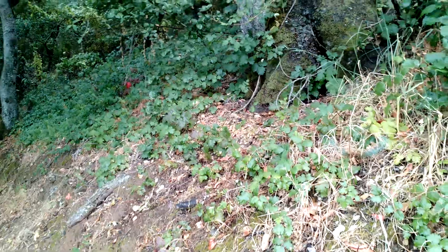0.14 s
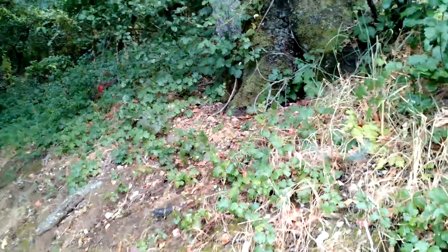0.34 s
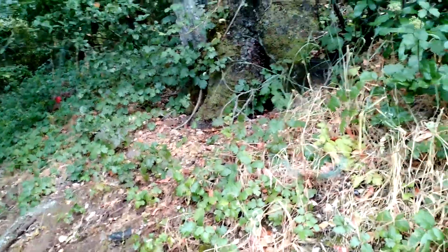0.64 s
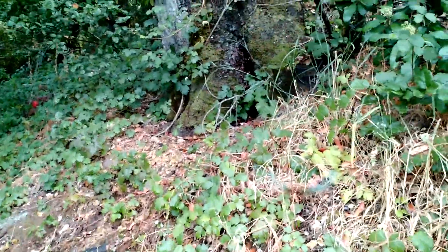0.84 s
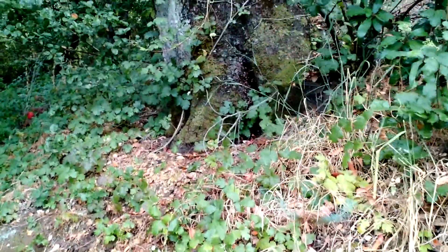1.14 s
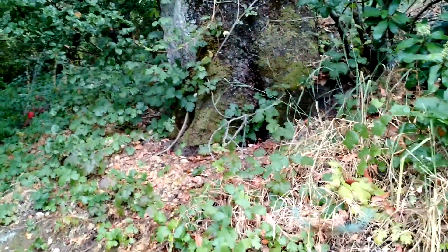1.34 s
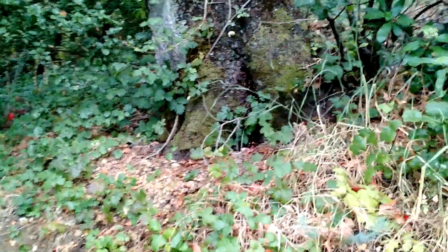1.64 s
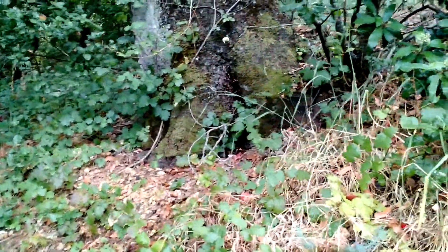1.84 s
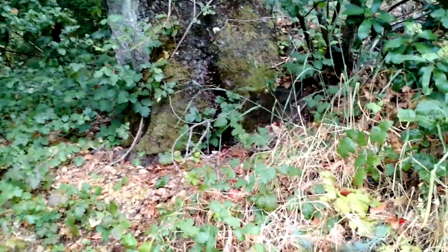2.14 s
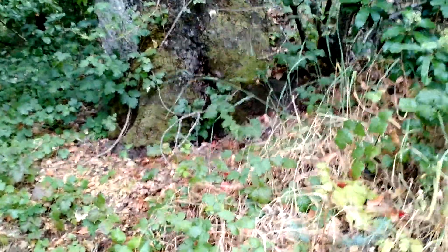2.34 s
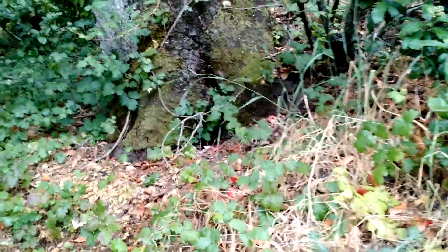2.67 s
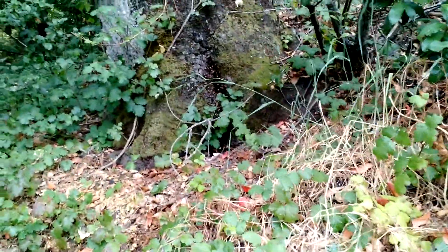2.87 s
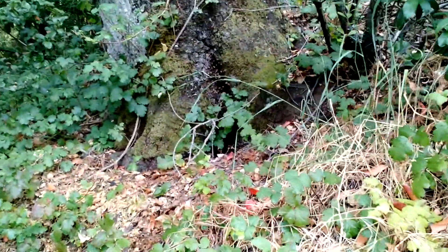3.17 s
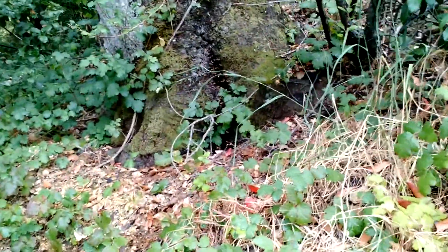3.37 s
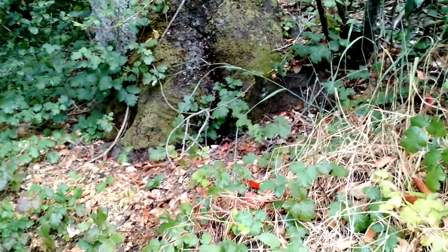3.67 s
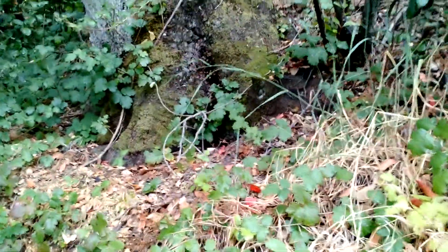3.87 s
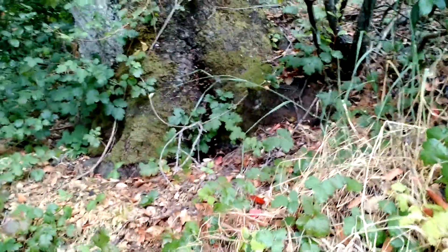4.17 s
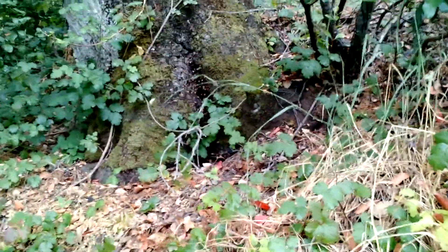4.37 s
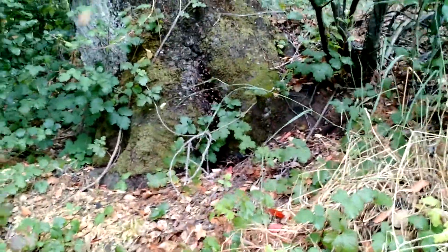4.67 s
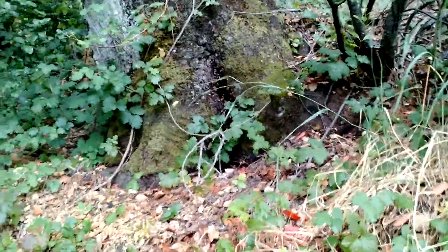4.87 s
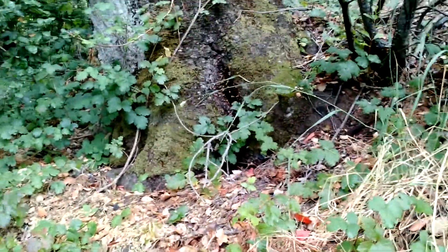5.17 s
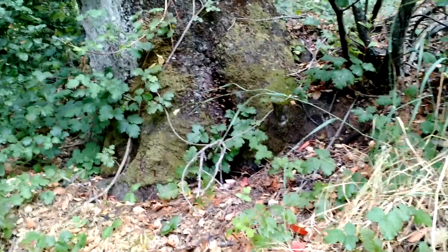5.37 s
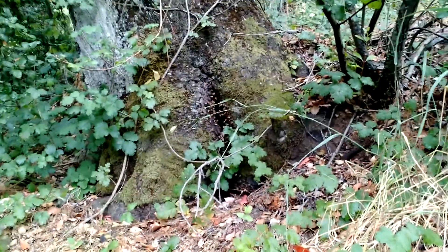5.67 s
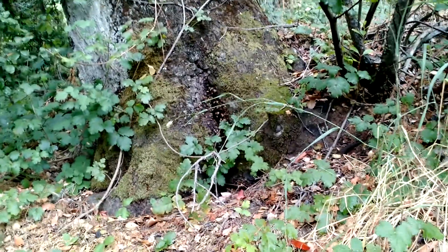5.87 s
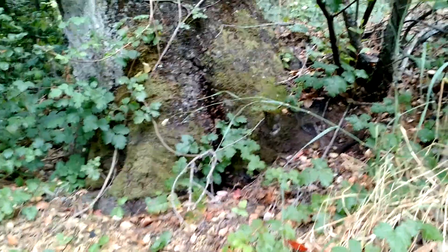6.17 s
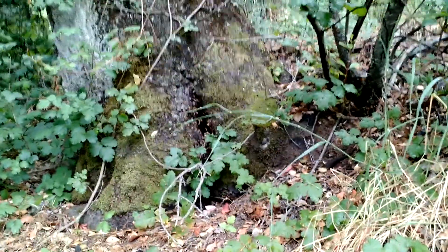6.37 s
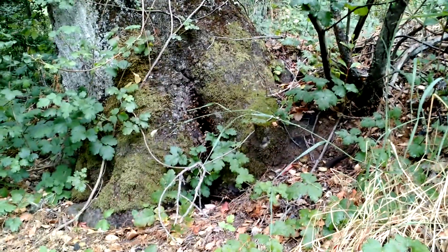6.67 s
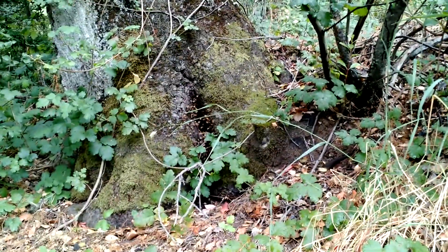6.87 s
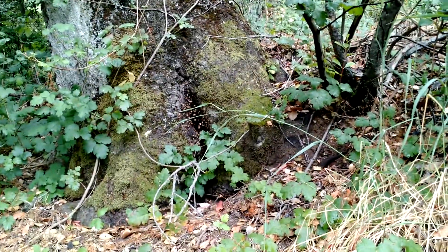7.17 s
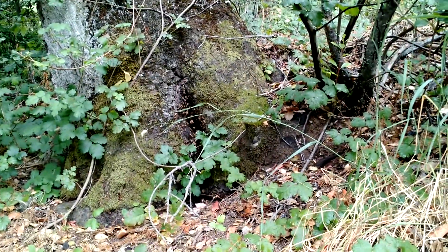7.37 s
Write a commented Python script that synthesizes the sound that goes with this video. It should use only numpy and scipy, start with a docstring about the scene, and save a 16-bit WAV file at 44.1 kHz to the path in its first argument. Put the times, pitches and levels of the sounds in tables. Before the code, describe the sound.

From 0 s a bee swarm buzzes continuously, many wing beats around 165-280 Hz blending into a thick, wavering drone, a little stronger at the start, dipping around 1 s. Under it are low rumble and unsteady hand shake, with soft air hiss brighter on the right; a very deep hum stops at about 1.4 s. A faint dry twig tick comes at 1.9 s, a sharper one at 3.8 s, then two small ones by 4.1 s, with a soft sleeve brush at 3.9 s. From about 5.3 s the swarm swells slightly, a tick and short cloth scuffs come close on the left, growing into a longer rub from 5.7 to 6.1 s. Across it, from 5.6 to 6.7 s, a bird gives a hoarse, high rasp on the right, climbing quickly, then throbbing about sixteen times a second and fading. Another tick falls near 5.85 s. The buzz alone continues to 7.5 s, the shaking calmer.

```python
"""Bees swarm at a tree trunk in a wood, a few steps from a hand-held camera with two microphones.
From the start: summed wing strokes, noise for low rumble, air hiss and hand shake, a sine hum to 1.4 s.
From 1.9 s twigs tick (decaying ring and crack); from 3.9 s a sleeve brushes at the left (gated noise).
From 5.6 s a bird rasps (noise on a climbing carrier) and rattles (rising chirps), its rasp on the right.
The camera widens its stereo by taking a late copy of each microphone out of the other side."""
import sys
import numpy as np
from scipy import signal
from scipy.fft import rfft, irfft, next_fast_len
from scipy.io import wavfile
from scipy.ndimage import map_coordinates

SR = 44100
rng = np.random.default_rng(int(sys.argv[2]) if len(sys.argv) > 2 else 0)


def file_out(sig):
    """Save sig as 16-bit WAV at sys.argv[1]."""
    # one column per channel
    cols = np.atleast_2d(sig).T
    # limit, then scale
    lim = np.clip(cols, -1, 1)
    pcm = np.round(lim * 32767).astype(np.int16)
    wavfile.write(sys.argv[1], SR, pcm)


N = 331191
T = np.arange(N) / SR  # s

# Levels hold at the microphones, before side gains and widening. Spectra are relative, per Hz.
# Air hiss spectrum: f/Hz, density/dB
AIR_SPECTRUM = [(60, -120), (110, -8), (140, 13), (175, 12), (310, 9.5), (600, -2), (1200, 4), (2000, -4),
                (2350, -2.5), (2650, -20.5), (2900, 2.5), (3300, -2.5), (4500, -2), (6300, -1.5),
                (9000, -3.5), (10500, -4.5), (16000, -9.5)]
# Air hiss balance: f/Hz, left-right/dB
AIR_BALANCE = [(60, 2), (200, 6.5), (600, 6), (2500, -5), (5000, -6.5), (10000, -4), (15000, -4)]
# Low rumble spectrum at first: f/Hz, density/dB
LOW_FIRST = [(12, -120), (20, -10), (45, -2.5), (75, -3.5), (100, -16.5), (130, -22.5), (180, -17),
             (215, -16), (300, -120)]
# Low rumble spectrum once risen: f/Hz, density/dB
LOW_RISEN = [(12, -120), (20, -12), (45, -5.5), (85, -7), (112, -7), (140, -26.5), (250, -120)]
# Hand shake spectrum: f/Hz, density/dB
SHAKE_SPECTRUM = [(1, 0), (11, -1), (16, -5), (26, -10), (40, -16), (80, -24), (134, -32), (300, -44),
                  (600, -120)]
# Twig ticks: t/s, ring level/dB, ring f/Hz, left-right/dB
TWIG_TICKS = [(1.945, -50, 4340, -18), (3.7986, -35.5, 6420, -9), (3.904, -47, 6170, -19),
              (4.066, -43, 3200, -3), (5.318, -39, 4640, -18), (5.848, -37, 3700, 2)]
# Long sleeve stroke: t/s, dull rub/dB, bright rub/dB, broad hiss/dB
LONG_STROKE = [(5.66, -64, -60, -59), (5.734, -49, -50, -46), (5.768, -54, -50, -52), (5.79, -44, -44, -46),
               (5.846, -41, -40.5, -46), (5.89, -43, -42.5, -50), (5.95, -46, -46.5, -57),
               (5.99, -46, -43.5, -59), (6.04, -56, -51.5, -60), (6.065, -45, -43, -65),
               (6.098, -44.5, -42.5, -59), (6.12, -71, -59, -58), (6.22, -73, -61, -64),
               (6.36, -80, -72, -69)]
# Short sleeve brushes: t/s, Gaussian 1/e half-width/s, dull rub/dB, bright rub/dB
SHORT_BRUSHES = [(3.91, 0.072, -57.5, -61), (5.284, 0.023, -46, -54), (5.297, 0.0095, -48.5, -53),
                 (5.313, 0.0074, -54, -48), (5.374, 0.004, -49, -59), (5.39, 0.0086, -54, -42),
                 (5.403, 0.0099, -49, -44.5), (5.416, 0.0065, -58, -51), (5.489, 0.034, -56, -50.5),
                 (5.6, 0.0097, -54.5, -50)]
# Dull rub of the long stroke: f/Hz, density/dB
STROKE_DULL = [(150, -120), (300, 1.5), (600, 4), (1200, 5.5), (1600, 3.5), (2000, -9), (2350, -13),
               (2550, -32), (4000, -120)]
# Dull rub of the short brushes: f/Hz, density/dB
BRUSH_DULL = [(200, -120), (400, 8), (800, -2.5), (1500, 1), (2100, -4), (2400, -4), (2700, -30),
              (4000, -120)]
# Bright rub of both: f/Hz, density/dB
RUB_BRIGHT = [(1800, -120), (2100, -22), (2530, -18), (2720, -2.5), (3200, -4), (3900, -15), (5000, -15),
              (7000, -13.5), (10000, -19), (16000, -41)]
# Hoarse noise in the call: f/Hz, density/dB
HOARSE_SPECTRUM = [(2450, -120), (2600, -17), (2800, 5), (3300, 5), (4500, 9), (6500, 0), (8000, -120)]
# Swell of each successive throb once the band is open: swell/dB
THROB_SWELLS = [3, 3, 6, 6, 1, 2, 3, 4, 5.5, 4.5, 3.5, 5, 6, 7, 6, 1]
# Swarm course: t/s, bees level/dB, low rumble level/dB (far drone, plus handling from 5.3 s)
SWARM_LEVELS = [(0, -50.5, -43), (.3, -52, -45.5), (.8, -54.5, -49.5), (1.4, -54.5, -50.5), (2, -53.5, -54),
                (2.7, -53.5, -53), (3.6, -52, -53), (4.2, -52, -52.5), (5.1, -52, -54), (5.35, -50, -48),
                (5.9, -49, -50), (6.25, -50, -48.5), (6.6, -51.5, -50), (7, -51.5, -51),
                (7.51, -51.5, -53.5)]
# Wing stroke harmonics: multiple of the wing rate/1, level/dB (relative)
WING_HARMONICS = [(1, 2), (2, 2.5), (3, -8), (4, -10), (5, -9.5), (6, -52), (7, -20.5), (8, -14)]
# Spread of mean wing rates: share of bees below/1, f/Hz
WING_RATES = [(0, 165), (.1, 192), (.28, 222), (.6, 243), (.9, 260), (1, 282)]
# Stereo widening: f/Hz, share of the other side taken out/1
CROSS_SHARE = [(20, .4), (150, .5), (500, .75), (1300, .95), (2650, 1), (4000, .76), (5500, .42),
               (9000, .3), (15000, .17)]

HISS_DB, HISS_FOLLOWS = -53.5, 0.91  # mean level; share of the swarm's dB swings followed
LOW_RISES_S = 5.9
SHAKE_DB, SHAKE_SWAY_DB, STEADY_FROM_S, CALM_DB_PER_S = -44.5, 1.5, 5.5, 7
HUM_HZ, HUM_AMPLITUDE_DB, HUM_ENDS_S, HUM_RELEASE_S = 46.8, -41, 1.39, .03
RING_T60_S, CRACK_T60_S, TICK_RISE_S, CRACK_OVER_RING_DB = .016, .016, .0003, 4
CALL_S, CALL_ENDS_S, CALL_ATTACK_S, CALL_RELEASE_S = 5.62, 6.7, 0.043, 0.16
CALL_DB, ACCENT_DB, ACCENT_S, SAG_DB_PER_S = -47, 6, 0.081, 8.5  # louder start, then fading effort
CENTRE_HZ, WIDTH_HZ, CLIMB_S = (4490, 5420), (650, 2100), 0.16  # band at start and once open
HOARSE_DB, HOARSE_EXTRA_DB = -6, 2.3  # re tonal rasp; extra before the band opens
RATTLE_S, THROB_SPACING_S = 5.633, .0637
THROB_PEAK_S, THROB_WIDTH_S = 0.016, 0.018  # from throb start
SLIP_DB, SLIP_PEAK_S, SLIP_WIDTH_S = -55.5, .013, 0.012
TOP_HZ = 15550


def amp(db):
    """dB to gain."""
    return 10 ** (np.asarray(db) / 20)


def unit(x):
    """Scale to rms 1."""
    return x / np.sqrt(np.mean(np.abs(x) ** 2) + 1e-20)


def along(points, hz):
    """Interpolate (Hz, value) points on a log frequency axis."""
    f, v = np.transpose(points)
    return np.interp(np.log(hz + 1), np.log(f + 1), v)


def curves(rows):
    """Interpolate each column over time; last comes a gate that is zero outside the rows' span."""
    s, *cols = np.transpose(rows)
    gate = np.clip(np.minimum(T - s[0], s[-1] - T) / 0.013, 0, 1)
    return [np.interp(T, s, c) for c in cols] + [gate]


def held(start_s, end_s, attack_s, release_s):
    """Linear attack, hold, linear release."""
    return np.clip(np.minimum((T - start_s) / attack_s, (end_s - T) / release_s), 0, 1)


def wobble(rate_hz, t=T, count=1):
    """Smooth random curves through rate_hz knots a second."""
    knots = rng.standard_normal((count, int(t[-1] * rate_hz) + 4))
    return np.array([map_coordinates(k, [t * rate_hz], order=2) for k in knots])


def filtered(x, response):
    """Apply a complex response of frequency."""
    m = next_fast_len(N + 8192)
    return irfft(rfft(x, m) * response(np.fft.rfftfreq(m, 1 / SR)), m)[..., :N]


def noise(spectrum, alike_hz):
    """Coloured noise, rms 1, alike at both microphones well below alike_hz, unrelated well above."""
    def shape(hz):
        turn = np.arccos(np.exp(-(hz / alike_hz) ** 2)) / 2
        return amp(along(spectrum, hz)) * [np.cos(turn), np.sin(turn)]

    both, apart = filtered(rng.standard_normal((2, N)), shape)
    return unit(np.array([both + apart, both - apart]))


def air_hiss():
    """Far leaves and microphone hiss: broadband noise, brighter on the right, following the swarm."""
    bees_db = curves(SWARM_LEVELS)[0]
    breeze_db = HISS_FOLLOWS * (bees_db - bees_db.mean()) + .5 * wobble(7.3)
    balance = lambda hz: amp(along(AIR_BALANCE, hz) * [[.5], [-.5]])
    hiss = filtered(noise(AIR_SPECTRUM, alike_hz=1110), balance)
    return amp(HISS_DB + breeze_db) * hiss


def low_rumble():
    """Far drone, plus handling from 5.3 s: low noise rising in pitch by an equal-power crossfade."""
    low_db = curves(SWARM_LEVELS)[1]
    risen = np.clip(T / LOW_RISES_S, 0, 1) * np.pi / 2
    first = np.cos(risen) * noise(LOW_FIRST, alike_hz=307)
    last = np.sin(risen) * noise(LOW_RISEN, alike_hz=315)
    return amp(low_db) * (first + last) * amp([[2], [-1]])


def hand_shake():
    """The body rocks in the hand: low noise, largely opposite at the microphones, calming at the end."""
    calm_db = CALM_DB_PER_S * np.maximum(T - STEADY_FROM_S, 0)
    shake_db = SHAKE_DB + SHAKE_SWAY_DB * wobble(1.5) - calm_db
    return amp(shake_db) * noise(SHAKE_SPECTRUM, alike_hz=2000) * [[.74], [-.68]]


def body_hum():
    """The body hums at first: a sine pushing the microphones opposite ways."""
    gate = held(0, HUM_ENDS_S, .06, HUM_RELEASE_S)
    hum = amp(HUM_AMPLITUDE_DB + .8 * wobble(4)[0]) * gate * np.sin(2 * np.pi * HUM_HZ * T)
    return hum * [[1.1], [-.9]]


def twigs():
    """Dry ticks: a decaying sine ring and noise crack; thin wood gives no bass and a dull top."""
    out = np.zeros((2, N + SR))
    t = np.arange(SR // 40) / SR
    for s, db, hz, pan_db in TWIG_TICKS:
        ring = np.sin(2 * np.pi * hz * t) * amp(-60 * t / RING_T60_S)
        crack = rng.standard_normal((2, len(t))) * amp(CRACK_OVER_RING_DB - 60 * t / CRACK_T60_S)
        gains = amp(db + np.array([[pan_db], [-pan_db]]) / 2)
        out[:, round(s * SR):][:, :len(t)] += gains * (ring + crack) * (1 - np.exp(-t / TICK_RISE_S))
    wood = lambda hz: 1 / (1 + 1j * hz / 12000) ** 2 / (1 - 1j * 2800 / (hz + 1)) ** 2
    return filtered(out[:, :N], wood)


def sleeve():
    """Cloth slides in many small slips, its rub much nearer the left microphone."""
    dull_db, bright_db, hiss_db, gate = curves(LONG_STROKE)
    dull, crease, bright = gate * amp(dull_db), 0, gate * amp(bright_db)
    for s, width_s, low_db, high_db in SHORT_BRUSHES:
        swell = np.exp(-((T - s) / width_s) ** 2)
        crease = crease + amp(low_db) * swell
        bright = bright + amp(high_db) * swell
    slips = unit(amp(1.7 * wobble(400) + .7 * wobble(40)))
    rub = dull * noise(STROKE_DULL, alike_hz=444)
    rub += crease * noise(BRUSH_DULL, alike_hz=447)
    rub += bright * noise(RUB_BRIGHT, alike_hz=3240)
    hiss = gate * amp(hiss_db) * noise(AIR_SPECTRUM, alike_hz=970)
    return slips * (rub * amp([[2], [-5]]) + hiss)


def throbs():
    """Index of the running throb and s into it; the extra last index is silent."""
    since_s = np.clip(T - RATTLE_S, 0, len(THROB_SWELLS) * THROB_SPACING_S)
    k, t = np.divmod(since_s, THROB_SPACING_S)
    return k.astype(int), t


def bird_rasp():
    """A narrow noise band climbs and widens, throbbing: random quadrature swings on a carrier."""
    since = np.maximum(T - CALL_S, 0)
    opened = 1 - np.exp(-(since / CLIMB_S) ** 2)
    centre_hz, width_hz = (a + (b - a) * opened for a, b in (CENTRE_HZ, WIDTH_HZ))
    knots = np.cumsum(width_hz) / SR  # a wider band changes faster
    grain = rng.standard_normal((2, 2, 30000))
    swing = np.array([[map_coordinates(g, [knots], order=1) for g in mic] for mic in grain])
    turn = 2 * np.pi * np.cumsum(centre_hz) / SR
    tonal = unit(swing[:, 0] * np.cos(turn) + swing[:, 1] * np.sin(turn))
    hoarse_db = HOARSE_DB + HOARSE_EXTRA_DB * (1 - opened)
    rasp = tonal + amp(hoarse_db) * noise(HOARSE_SPECTRUM, alike_hz=3000)
    k, t = throbs()
    swell_db = np.append(THROB_SWELLS, 0)[k] * (t > 0)
    throb_db = swell_db * np.exp(-((t - THROB_PEAK_S) / THROB_WIDTH_S) ** 2)
    db = CALL_DB + ACCENT_DB * np.exp(-(since / ACCENT_S) ** 2) - SAG_DB_PER_S * since
    db = db + throb_db * opened + 1.3 * wobble(60)
    gate = held(CALL_S, CALL_ENDS_S, CALL_ATTACK_S, CALL_RELEASE_S)
    return gate * amp(db) * rasp * amp([[-2], [2]])


def bird_rattle():
    """Each throb starts with a rising slip: a chirp and its octave, opposite at the microphones."""
    k, t = throbs()
    size = np.append(rng.uniform(.8, 1.2, len(THROB_SWELLS)), 0)[k] * (t > 0)
    phase = 2 * np.pi * (1900 * t + 32000 * t * t)  # from 1900 Hz, rising 64 Hz per ms
    swell = np.exp(-((t - SLIP_PEAK_S) / SLIP_WIDTH_S) ** 2)
    slip = amp(SLIP_DB) * size * swell * (np.sin(phase) + .8 * np.sin(2 * phase))
    return slip * amp(2.5 * wobble(300)) * [[.6], [-.6]]


def bees(count=60, step=8):
    """Many fliers repeat a wing stroke, each at its own wandering rate and level, from a fixed bearing."""
    t = T[::step]
    rank = (np.arange(count)[:, None] + rng.random((count, 1))) / count
    beat_hz = np.interp(rank, *np.transpose(WING_RATES)) * (1 + .025 * wobble(3.5, t, count))
    near = amp(5 * wobble(4, t, count))
    lead_s = 0.00012 * rng.standard_normal((count, 1))  # left microphone hears it first by this
    turns = np.cumsum(beat_hz, axis=1) * step / SR + rng.random((count, 1))
    cycle = np.arange(1024) / 1024
    stroke = sum(amp(db) * np.sin(2 * np.pi * round(k) * cycle + k * k) for k, db in WING_HARMONICS)
    heard = []
    for side in (1, -1):
        side_turns = turns + side * beat_hz * lead_s / 2
        heard.append(np.sum(near * stroke[(side_turns * 1024).astype(int) % 1024], axis=0))
    swarm = unit(signal.resample_poly(heard, step, 1, axis=1)[:, :N])
    return amp(curves(SWARM_LEVELS)[0]) * swarm


def scene():
    """Sum of all sources at the two microphones."""
    background = air_hiss() + low_rumble() + hand_shake() + body_hum()
    return background + twigs() + sleeve() + bird_rasp() + bird_rattle() + bees()


def record(dry):
    """Each side loses a late, filtered copy of the other; the start fades in; the band ends at TOP_HZ."""
    def late(hz):
        lag_rad = 2 * np.pi * hz / 2980 + 1.27 * np.tanh(hz / 4450)  # 1/2980 s delay plus phase lag
        return along(CROSS_SHARE, hz) * np.exp(-1j * lag_rad)

    wide = (dry - filtered(dry[::-1], late)) * np.clip(T / 0.13, .15, 1)
    return filtered(wide, lambda hz: hz < TOP_HZ)


dry = scene()
out = record(dry)
file_out(out)
```